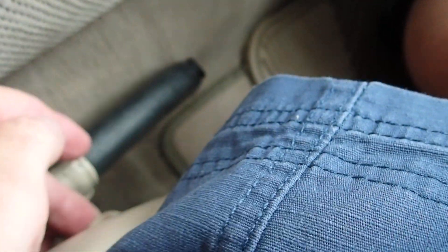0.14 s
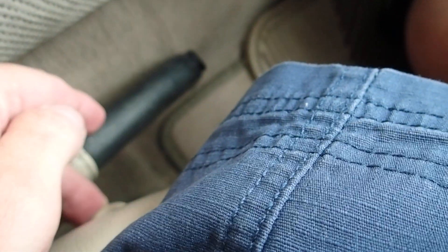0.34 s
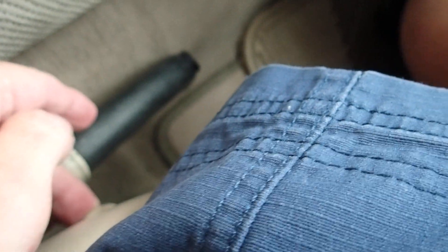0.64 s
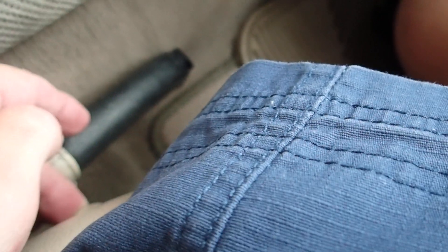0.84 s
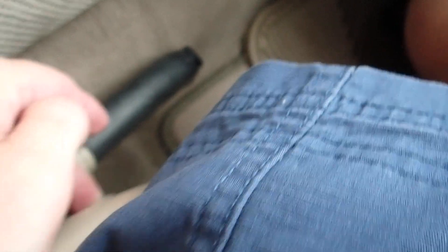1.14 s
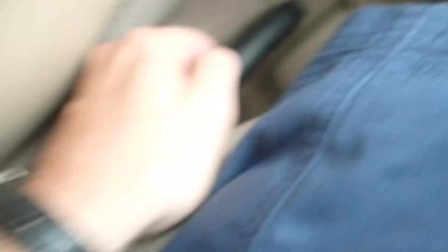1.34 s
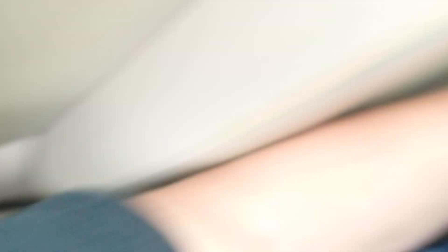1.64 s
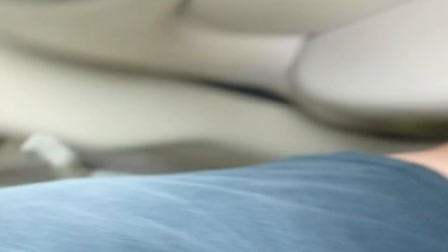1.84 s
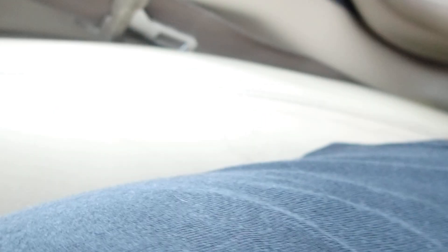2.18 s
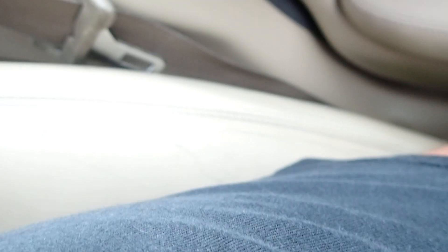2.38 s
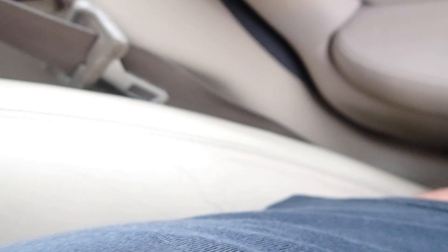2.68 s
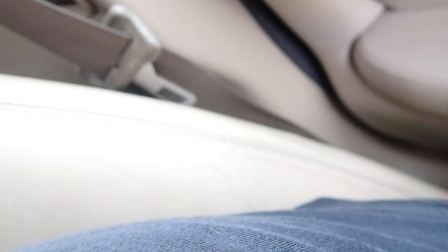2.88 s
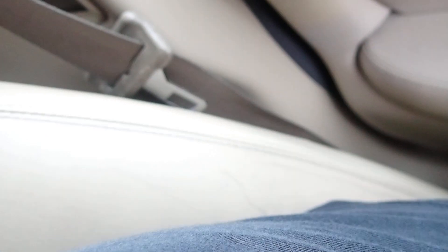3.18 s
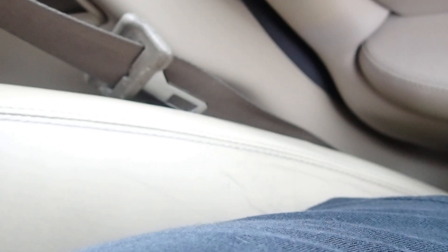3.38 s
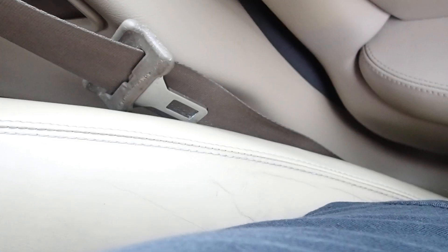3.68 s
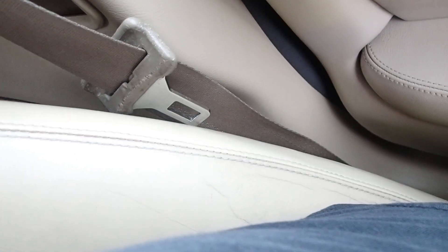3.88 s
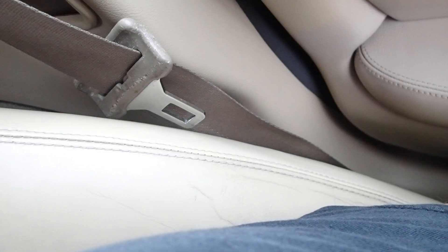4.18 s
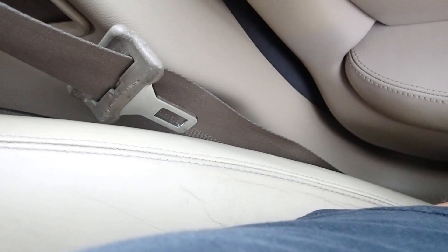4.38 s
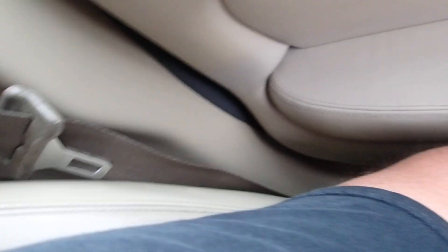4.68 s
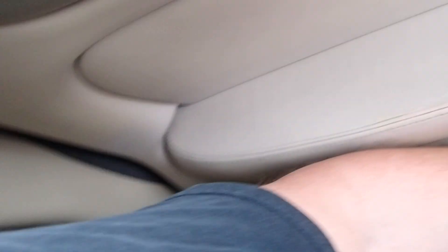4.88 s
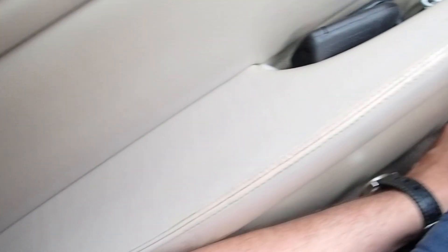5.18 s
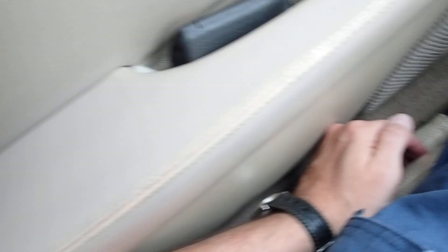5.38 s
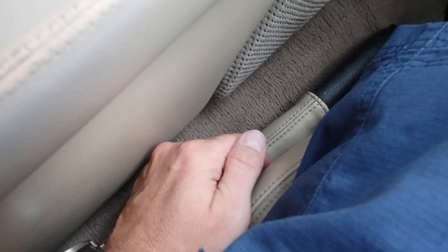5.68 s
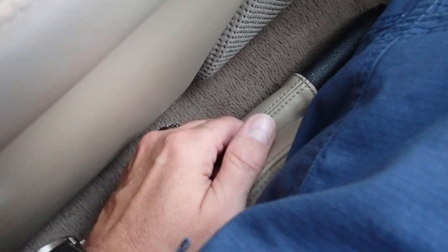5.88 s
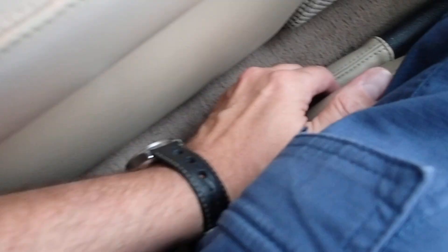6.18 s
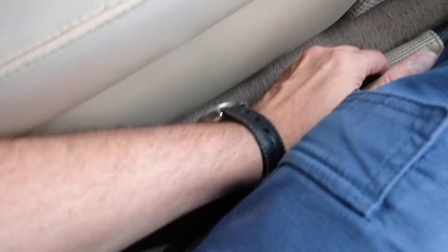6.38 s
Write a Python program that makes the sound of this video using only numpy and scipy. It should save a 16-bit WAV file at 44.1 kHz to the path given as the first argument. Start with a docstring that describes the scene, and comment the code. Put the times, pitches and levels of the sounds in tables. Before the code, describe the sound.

An engine idles inside a parked car while a small electric motor whines and buzzes amid clicks, creaks and rustling clothes.

```python
"""Inside a parked car, on a hand-held stereo microphone. Throughout, the idling engine booms over a soft
rumble and insects hiss outside. Close by, trim snaps, a switch clicks and at 0.4 s a small electric motor
whines thinly for a second while the moving part creaks in slips. Cloth rubs as someone shifts on the seat;
at 2.3 s a bird gives four faint notes. Near 3.5 s the motor runs again between clicks, now with a rough
buzz. More rubbing and snaps follow, and from 5.6 s a second bird chirps faintly."""
import sys
import numpy as np
from scipy import signal
from scipy.fft import rfft, irfft, next_fast_len
from scipy.io import wavfile
from scipy.ndimage import map_coordinates

SR = 44100
rng = np.random.default_rng(int(sys.argv[2]) if len(sys.argv) > 2 else 0)


def waveform_to_disk(signal):
    """Save audio, clipped to [-1, 1], as 16-bit WAV at the path in sys.argv[1]."""
    frames = np.transpose(np.atleast_2d(signal))
    scaled = np.clip(frames, -1, 1) * 32767
    samples = np.round(scaled).astype(np.int16)
    wavfile.write(sys.argv[1], SR, samples)


N = 287955
T = np.arange(N) / SR

# Noise colours as heard from the seat. Each row: frequency in Hz, relative density in dB.
OUTSIDE_SPECTRUM = [(590, -43), (1000, 0), (1090, -1.5), (1410, -7.5), (1900, -27.5), (3160, -20.5),
                    (3990, -28), (5780, -5.5), (6770, -7.5), (7640, -2.5), (8540, -4.5), (9200, -27.5),
                    (12000, -33), (20200, -120)]  # insects and distant traffic
RUMBLE_SPECTRUM = [(12, -59), (20, -13), (54, -11.5), (93, -1.5), (166, 2.5), (202, 2.5), (229, -2),
                   (265, -4.5), (323, -10.5), (555, -19), (1500, -34.5), (1950, -81), (3300, -120)]  # engine noise in the cabin
GROAN_SPECTRUM = [(70, -26), (130, -11), (250, 2), (420, -8), (620, -15), (760, -16), (1100, -21.5),
                  (1800, -28), (2600, -54)]  # weight shifting on the seat
CLOTH_SPECTRUM = [(600, -26.5), (1000, -8), (1800, -1.5), (2400, -5), (3050, -1), (4000, -10), (4500, -5.5),
                  (5450, -7.5), (6560, -13.5), (7600, -8), (9400, -24), (13500, -30), (16000, -50)]  # cloth rubbing
SLIDE_SPECTRUM = [(1000, -61), (1300, -3), (1450, 6.5), (1650, -3), (2300, -49), (2850, -6), (3080, -1.5),
                  (3400, -4), (3900, -29)]  # a slide with two hollow resonances
SNAP_LOW_SPECTRUM = [(700, -7), (1000, -7), (1700, -5), (2100, -8), (2600, -43)]  # a snap's body
SNAP_MID_SPECTRUM = [(1600, -48), (2300, 3.5), (3100, 7), (4000, 1), (4700, 3), (6000, -2), (6800, -25)]  # its crack
SNAP_AIR_SPECTRUM = [(5500, -57), (6800, 4.5), (7800, 8.5), (9000, -2), (11000, -7.5), (15000, -9)]  # its airy top
DOOR_SPECTRUM = [(250, -1), (350, -4), (510, -3.5), (690, -11), (820, -19), (1100, -15), (1280, -5.5),
                 (1550, -15), (1800, -23), (3100, -26), (4200, -56)]  # motor buzz through the door panel
MIC_HISS_SPECTRUM = [(3000, -30), (9000, -2), (13000, -1.5), (15800, -4)]  # the microphone's own noise

# First bird, outside. Each row: start and length in seconds, first and last pitch in Hz, peak in dB.
BIRD_NOTES = [(2.266, .055, 1910, 1960, -48.5), (2.401, 0.043, 1960, 1970, -50.5),
              (2.474, .035, 1960, 1950, -51.5), (2.52, 0.037, 1940, 1930, -56)]
# Second bird, outside. Each row: start of a phrase in seconds, number of chirps.
BIRD_PHRASES = [(5.594, 5), (6.0, 8)]
# The idle. Each row: time in seconds, firing pattern rate in Hz, levels of order 7, order 8, rumble in dB.
ENGINE_IDLE = [(0.0, 26.9, -29.5, -41, -35.5), (1.03, 27.69, -28, -41, -31), (1.4, 26.85, -30, -33.5, -35),
               (2.0, 27.19, -28, -35.5, -30.5), (2.6, 27.39, -30.5, -39, -36),
               (3.05, 26.58, -38.5, -31, -40.5), (3.56, 27.19, -33.5, -40.5, -33.5),
               (3.95, 26.7, -35, -36, -34), (4.9, 26.66, -32, -35, -37.5), (5.3, 27.28, -30, -35, -38.5),
               (6.53, 27.2, -27.5, -34.5, -36)]
# Quieter engine orders. Each row: multiple of the firing pattern rate, level in dB.
QUIET_ORDERS = [(5, -42.5), (6, -40), (9, -48), (10, -49.5), (12, -46)]
# Tones of an engine accessory. Each row: frequency in Hz, level in dB.
ACCESSORY_HUMS = [(382, -51), (490, -57)]
# A body moving on the seat. Each row: start, rise, hold and fall in seconds,
# then the levels of groan, cloth rub and hollow slide in dB.
SEAT_MOVES = [(.7, 0.46, .15, .05, -36, -52.5, -70), (1.45, 0.35, .08, 0.098, -31.5, -43.5, -52),
              (1.674, 0.27, 0.15, 0.16, -27, -36, -41.5), (2.118, 0.07, 0.1, 0.14, -33, -49, -56.5),
              (3.29, 0.24, 0.23, 0.66, -33.5, -52.5, -67), (4.017, 0.21, 0.023, 0.085, -34.5, -51.5, -61),
              (4.498, 0.367, .2, 0.066, -46, -45.5, -45.5),
              (4.827, 0.086, 0.22, 0.035, -31.5, -45.5, -45.5), (5.123, .04, .05, 0.96, -40, -50.5, -61),
              (5.75, 0.38, 0.016, .45, -40, -52.5, -64)]
# The seat between movements: the levels of groan, cloth rub and hollow slide in dB.
SEAT_REST_DB = [-44, -58.5, -66]
# Slips of the moving part and the seat. Each row: start in seconds, level in dB, relative thump in dB.
SLIPS = [(0.241, -22, -7), (0.263, -27, -9), (0.308, -27, -16), (0.325, -29.5, -3), (0.355, -24, -2),
         (0.596, -17.5, -2), (0.603, -30.5, 13.5), (0.639, -22, 1.5), (0.687, -22, 3), (0.745, -18, -5),
         (0.791, -19, -3), (0.829, -30, -11), (0.854, -18.5, 1), (0.919, -19, 4), (0.961, -24.5, -15),
         (1.011, -21.5, -2), (1.06, -20, 4.5), (1.085, -28, 6), (1.116, -20, -2), (1.165, -21, 2),
         (1.2, -18.5, 0), (1.242, -17.5, 1.5), (1.274, -20, 4), (1.308, -17.5, -1), (1.333, -19, 6),
         (1.361, -21, 4.5), (1.383, -18, 0), (1.507, -20, -4), (1.6, -26, -2), (1.695, -29, 8),
         (1.843, -37, 6), (2.065, -36, 17), (3.441, -24, 4.5), (4.164, -24.5, 3), (4.277, -24.5, 2),
         (4.92, -40, 11), (4.945, -31.5, 8.5), (5.02, -32, 10), (5.092, -25.5, -15), (5.646, -22, 1.5)]
# Panel modes that a slip strikes. Each row: frequency in Hz, time to fall 60 dB in seconds.
PANEL_MODES = [(265, 0.042), (349, 0.028), (517, 0.021), (791, 0.02), (660, 0.018), (1446, 0.014),
               (2164, 0.016), (3000, 0.011)]
# Nearby clicks and snaps. Each row: start in seconds, level in dB,
# low and airy parts in dB against the middle part, time to fall 60 dB in seconds.
SNAP_EVENTS = [(0.075, -44.5, 5, -16, 0.032), (0.14, -42, 4.5, -21, 0.06), (0.15, -33, 6, -20, 0.022),
               (0.2618, -34.5, 7, -3, 0.027), (0.289, -38.5, 3, -1, .03), (0.307, -36, 4, -13, 0.028),
               (0.325, -42, -1, -13, .025), (0.339, -44, 8, -13, .025), (0.3525, -22, -13, 3, 0.034),
               (0.598, -35, 2, -1, 0.043), (0.892, -34.5, 10.5, -5.5, 0.034),
               (1.1397, -18, -14, -10, 0.016), (1.257, -39, 9, -6, .03), (1.268, -25, -12, -8, 0.026),
               (1.3707, -25.5, -7, -3, 0.052), (1.4132, -27, -6, -4.5, 0.02),
               (1.541, -29.5, -30, -4.5, 0.034), (1.623, -38.5, 3, -7, .05), (1.793, -35.5, -2, -6, .025),
               (1.9086, -23.5, -1, -25, .025), (2.2438, -32.5, -4, -7, .035), (2.614, -39.5, 0, -7, 0.081),
               (2.7263, -45.5, -2, -8, 0.14), (3.353, -39, 1.5, -1, 0.063), (3.436, -35, -7, -1, 0.095),
               (3.461, -38, 3, -2, 0.038), (3.5364, -35, 4, -7, 0.037), (4.206, -34, 3, -9, 0.048),
               (4.2729, -33, -1, -4, 0.072), (4.3175, -39, -1, -7, .048), (4.353, -41, 6, -9, 0.043),
               (4.892, -33.5, -0.5, -7, 0.052), (5.4067, -37, -3, -4, 0.1), (5.6428, -34, -3, 1.5, 0.04),
               (5.8224, -38.5, -0.5, -15, 0.042), (6.0277, -42, 10.5, -7, 0.035),
               (6.0841, -33, 1, -5, 0.045), (6.253, -34.5, 1, -21, 0.072), (6.337, -47.5, 8.5, -17, 0.055)]
# Motor runs. Each row: on and off in seconds, first and last running speed in turns a second,
# whine gain in dB, first and last buzz gain in dB.
MOTOR_RUNS = [(.365, 1.38, 87.2, 85.2, -68, -64, -62), (3.45, 4.28, 88, 80, -72, -38.5, -42)]
# The commutator's whine. Each row: multiple of the shaft rate, relative level in dB.
COMMUTATOR_ORDERS = [(12, -19), (24, 0), (30, 7.5), (36, 8)]

# Cabin noise at the two microphone ports. Each row: frequency in Hz, left-right correlation.
PORT_LIKENESS = [(60, 0.93), (250, 1), (600, 0.87), (1200, 0.81), (2400, 0.92), (5000, 0.39), (9000, 0.075),
                 (15000, 0.069)]
# Colour difference of the ports. Each row: frequency in Hz, left over right in dB.
PORT_BALANCE = [(60, -2.5), (150, -1.5), (380, -1.0), (950, -0.5), (2380, -2.5), (5980, 2), (15000, -0.5)]
# Shading by the microphone's housing. Each row: frequency in Hz, phase lead of the left in radians.
PORT_PHASE = [(2400, .1), (3200, 0.97), (3550, 0.69), (4200, 0.14), (5000, 1), (6300, -2.1), (7500, -0.49),
              (8900, 0.014)]


def amp(db):
    """Decibels to amplitude."""
    return 10 ** (np.asarray(db) / 20)


def unit(x):
    """x scaled to rms 1."""
    return x / np.sqrt(np.mean(x ** 2) + 1e-20)


def along(points, hz):
    """(Hz, value) points joined on a log axis."""
    f, v = np.transpose(points)
    return np.interp(np.log(hz + 1), np.log(f + 1), v)


def wobble(rate):
    """A smooth random curve, rate knots a second."""
    return map_coordinates(rng.standard_normal(int(N * rate / SR) + 4), [T * rate])


def swell(start, rise, hold, fall):
    """0 to 1 and back, in straight lines."""
    return np.interp(T, np.cumsum([start, rise, hold, fall]), [0, 1, 1, 0])


def filtered(x, response):
    """x through a frequency response."""
    size = next_fast_len(x.shape[-1] + 8192)
    return irfft(rfft(x, size) * response(np.fft.rfftfreq(size, 1 / SR)), size)[..., :x.shape[-1]]


def rush(spectrum, n=N):
    """Stereo noise of rms 1, as alike at both ports as the cabin makes it."""
    def mid_side_gains(hz):
        width = np.arccos(np.clip(along(PORT_LIKENESS, hz), -1, 1)) / 2
        return amp(along(spectrum, hz)) * [np.cos(width), np.sin(width)]
    mid, side = filtered(rng.standard_normal((2, n)), mid_side_gains)
    return unit(np.array([mid + side, mid - side]))


def cabin_ring(x, t60=0.087):
    """The short ring of the padded cabin around the microphone."""
    t = np.arange(SR // 6) / SR
    tail = rush([(50, -15.5), (15000, -26.5)], len(t)) * amp(-60 * t / t60)
    return signal.fftconvolve(x, tail / np.linalg.norm(tail[0]), axes=1)[:, :N]


def insects_and_traffic(level_db=-53.5):
    """Outside the car, a flickering hiss of insects with traffic far off."""
    return amp(level_db + 1.1 * wobble(16)) * rush(OUTSIDE_SPECTRUM)


def whistling_bird():
    """One bird, faint from in here, whistles four nearly level notes."""
    out = np.zeros(N)
    for start, length, first_hz, last_hz, db in BIRD_NOTES:
        progress = np.clip((T - start) / length, 0, 1)
        hz = first_hz + (last_hz - first_hz) * progress
        out += amp(db) * np.sin(np.pi * progress) ** .7 * np.sin(2 * np.pi * np.cumsum(hz) / SR)
    return out


def chirping_bird(spacing_s=.0672, chirp_s=0.02964, peak_db=-54):
    """Another bird outside gives two quick phrases of arched chirps."""
    out = np.zeros(N)
    progress = np.arange(round(chirp_s * SR)) / (chirp_s * SR)
    hz = 3460 - 550 * (2 * progress - 1) ** 4  # quick rise, flat top, quick fall
    chirp = np.sin(np.pi * progress) ** 0.77 * np.sin(2 * np.pi * np.cumsum(hz) / SR)
    for start, count in BIRD_PHRASES:
        for k in range(round(count)):
            onset = round((start + k * spacing_s) * SR)
            out[onset:][:len(chirp)] += amp(rng.normal(peak_db, 1.2)) * chirp
    return out


def engine():
    """From the seat: trembling orders of the firing pattern, over rumble that throbs with the firing."""
    times, *columns = np.transpose(ENGINE_IDLE)
    hz, boom_db, eighth_db, rumble_db = [np.interp(T, times, column) for column in columns]
    phase = 2 * np.pi * np.cumsum(hz * (1 + 0.0019 * wobble(4.52))) / SR
    tones = np.zeros(N)
    for k, db in [(2, boom_db - 13), (7, boom_db), (8, eighth_db), *QUIET_ORDERS]:
        tones += amp(db + 1.43 * wobble(14)) * np.sin(k * phase + 0.49 * wobble(14) + np.pi * k * k / 2)
    for hum_hz, db in ACCESSORY_HUMS:
        tones += amp(db + 2.74 * wobble(5)) * np.sin(2 * np.pi * hum_hz * T + 0.75 * wobble(4.4))
    throb = 1 + 0.21 * np.sin(phase)
    return np.sqrt(2) * tones + amp(rumble_db) * throb * rush(RUMBLE_SPECTRUM)


def seat_movement():
    """The seat groans in lumps as weight shifts; cloth rubs more finely, at times with a hollow ring."""
    lifts_db = [np.outer(np.subtract(move[4:], SEAT_REST_DB), swell(*move[:4])) for move in SEAT_MOVES]
    groan_db, cloth_db, slide_db = np.max(lifts_db, axis=0) + np.c_[SEAT_REST_DB]
    groan = amp(groan_db) * unit(amp(2.55 * wobble(70)) * rush(GROAN_SPECTRUM))
    cloth = amp(cloth_db) * unit(amp(1.5 * wobble(45)) * rush(CLOTH_SPECTRUM))
    slide = amp(slide_db) * unit(amp(3.0 * wobble(60)) * rush(SLIDE_SPECTRUM))
    return groan + cloth + slide


def creaks(middle_db=-1, upper_db=-10.5, rise_s=.0007):
    """Close by, each slip knocks the same panel modes at slightly new strengths and pitches."""
    out, t = np.zeros(N + SR), np.arange(SR // 10) / SR
    hz, t60 = np.transpose(PANEL_MODES)[:, :, None]
    for start, db, thump_db in SLIPS:
        mode_db = np.select([hz < 450, hz < 1300], [thump_db, middle_db], upper_db)
        mode_db = mode_db + rng.normal(0, 2, hz.shape)
        pitch = hz * np.exp(rng.normal(0, 0.043, hz.shape))
        phase = 2 * np.pi * pitch * t + rng.normal(np.pi, .5, hz.shape)
        ring = (amp(mode_db - 60 * t / t60) * np.sin(phase)).sum(axis=0)
        out[round(start * SR):][:len(t)] += amp(db) * ring * (1 - np.exp(-t / rise_s))
    return out[:N]


def snaps(rise_s=.0012):
    """Switch, trim and buckle near the microphone: short noise bursts in three bands."""
    out, t = np.zeros((2, N + SR)), np.arange(SR // 11) / SR
    for start, db, low_db, air_db, t60 in SNAP_EVENTS:
        burst = rush(SNAP_MID_SPECTRUM, len(t))
        burst += amp(low_db) * rush(SNAP_LOW_SPECTRUM, len(t))
        burst += amp(air_db) * rush(SNAP_AIR_SPECTRUM, len(t))
        envelope = amp(db - 60 * t / t60) * (1 - np.exp(-t / rise_s))
        out[:, round(start * SR):][:, :len(t)] += envelope * burst
    return out[:, :N]


def motor(spin_up_s=.04, spin_up_depth=.16, switch_s=.025):
    """The motor spins up, then slows under load; its commutator whines and its gears buzz in the door."""
    shaft_hz, whine_gain, buzz_gain = np.zeros((3, N))
    for start, stop, first_hz, last_hz, whine_db, first_db, last_db in MOTOR_RUNS:
        on = swell(start, switch_s, stop - start - switch_s, switch_s)
        spin_up = 1 - spin_up_depth * np.exp(-np.abs(T - start) / spin_up_s)
        shaft_hz += (on > 0) * np.interp(T, [start, stop], [first_hz, last_hz]) * spin_up
        whine_gain += on * amp(whine_db)
        buzz_gain += on * amp(np.interp(T, [start, stop], [first_db, last_db]))
    angle = 2 * np.pi * np.cumsum(shaft_hz * (1 + 0.0038 * wobble(30))) / SR
    whine = sum(amp(db + 3 * wobble(150)) * np.sin(k * angle + .5 * wobble(150))  # uneven brush contact
                for k, db in COMMUTATOR_ORDERS)
    pulse = .5 + .5 * np.cos(angle)
    beat = .25 + pulse ** 4 * amp(2.2 * wobble(45) + 3 * np.cos(angle / 2))  # every second turn is harder
    strikes = (shaft_hz > 0) * pulse ** 400 * amp(1.5 * wobble(60))  # the same tooth strikes every turn
    knock = filtered(strikes, lambda hz: amp(along(DOOR_SPECTRUM, hz)))
    buzz = unit(beat * rush(DOOR_SPECTRUM)) + 0.73 * unit(knock)
    return whine_gain * whine + buzz_gain * buzz


def scene():
    """All that reaches the seat; the close creaks and snaps also ring in the cabin."""
    close = creaks() + snaps()
    background = engine() + insects_and_traffic() + whistling_bird() + chirping_bird()
    return background + motor() + seat_movement() + close + amp(-9.0) * cabin_ring(close)


def record(dry, top_hz=15850):
    """The hand-held microphone: two ports, unlike in colour and phase, with hiss and a band limit."""
    def ports(hz):
        gain = amp(np.outer([.5, -.5], along(PORT_BALANCE, hz)))
        phase = np.outer([.5, -.5], along(PORT_PHASE, hz))
        return gain * np.exp(1j * phase) * (hz < top_hz)
    hiss = filtered(rng.standard_normal((2, N)), lambda hz: amp(along(MIC_HISS_SPECTRUM, hz)))
    return filtered(dry + amp(-55.5) * unit(hiss), ports)


dry = scene()
out = record(dry)
waveform_to_disk(out)
```